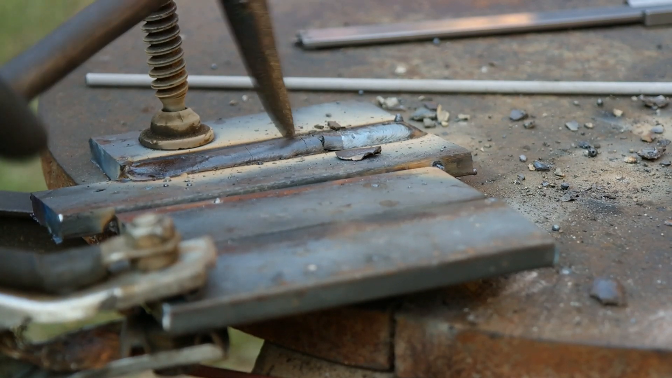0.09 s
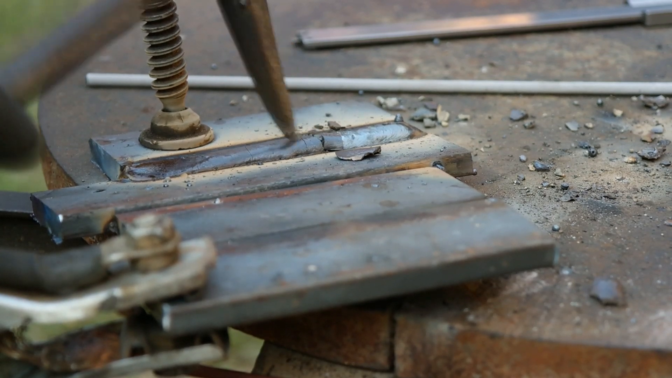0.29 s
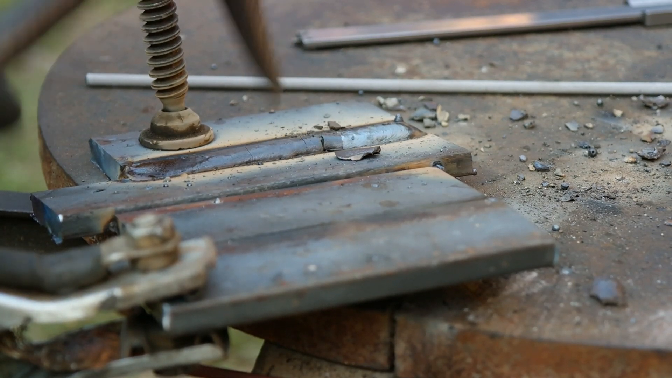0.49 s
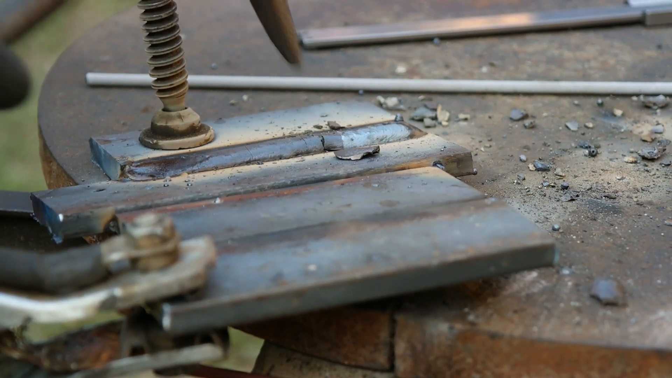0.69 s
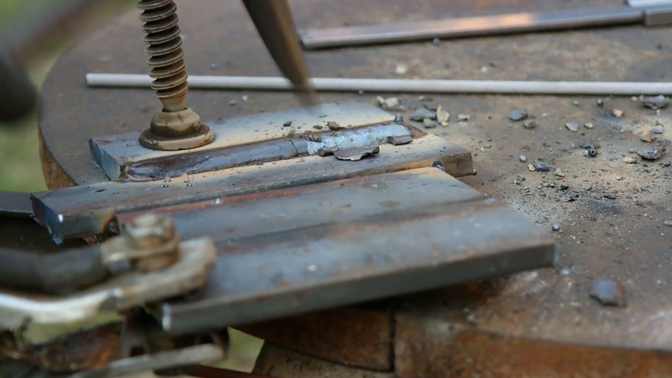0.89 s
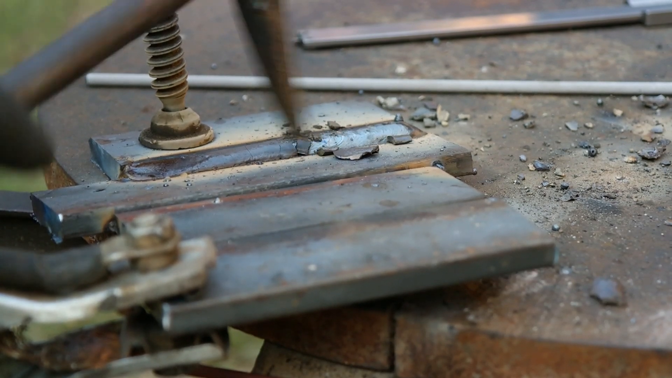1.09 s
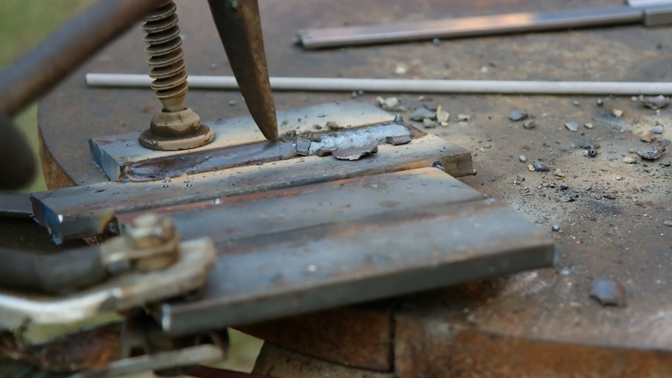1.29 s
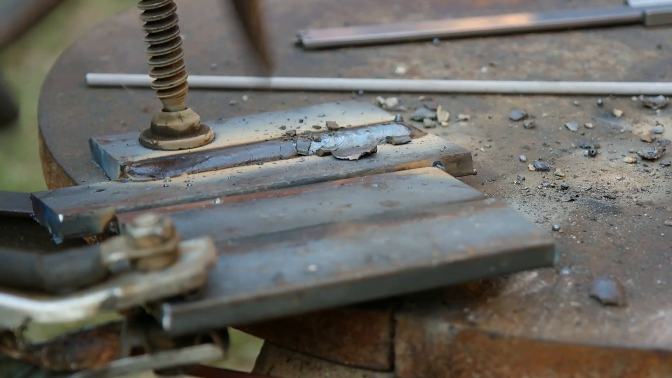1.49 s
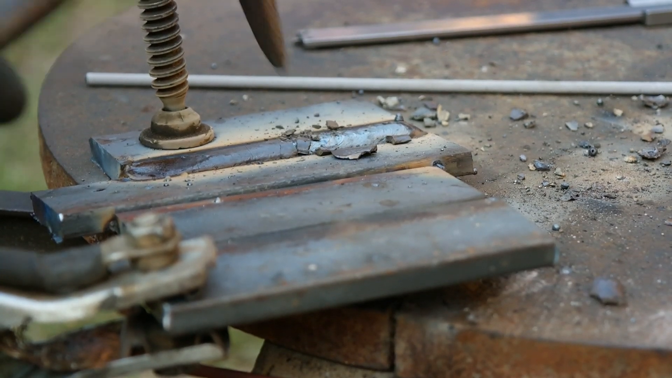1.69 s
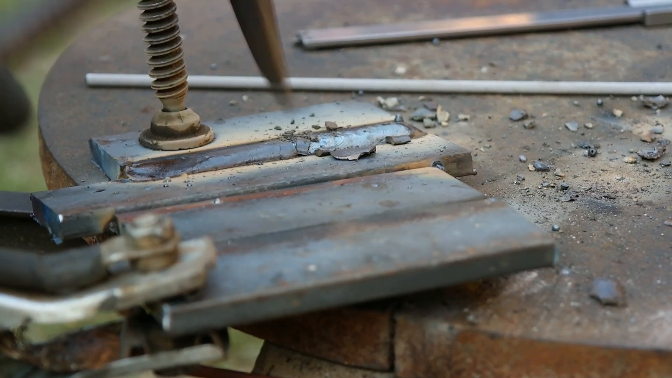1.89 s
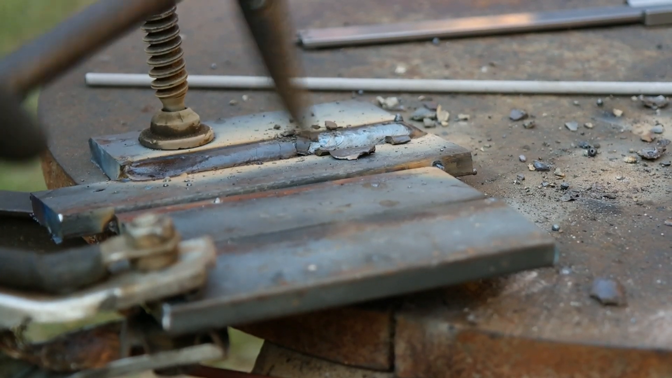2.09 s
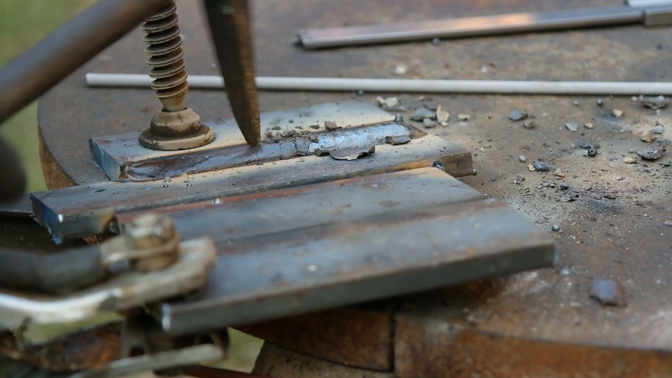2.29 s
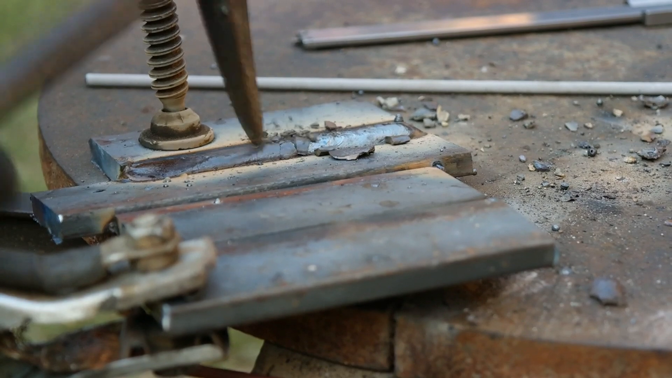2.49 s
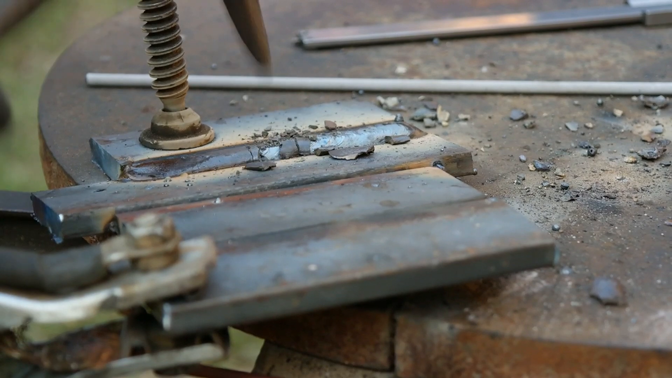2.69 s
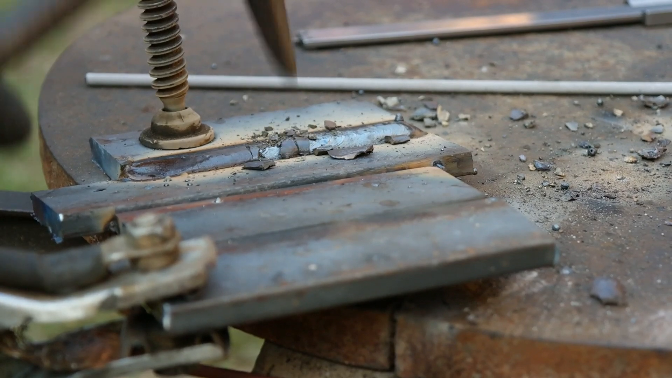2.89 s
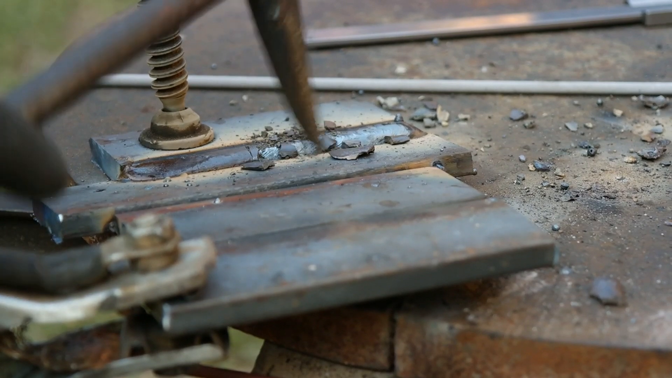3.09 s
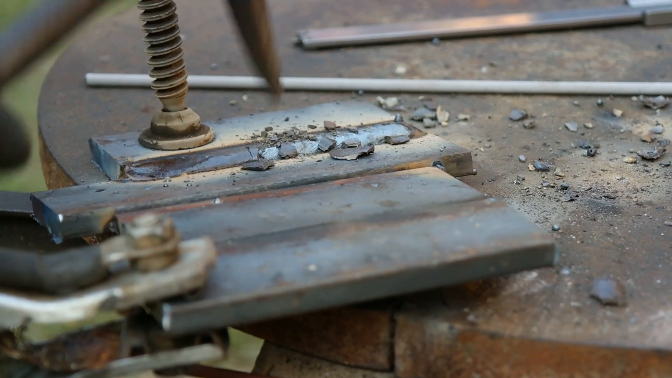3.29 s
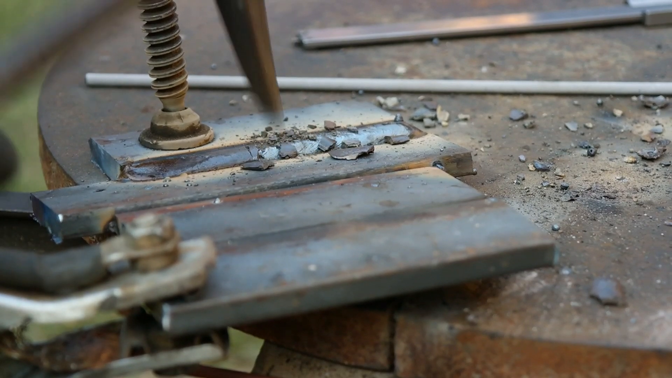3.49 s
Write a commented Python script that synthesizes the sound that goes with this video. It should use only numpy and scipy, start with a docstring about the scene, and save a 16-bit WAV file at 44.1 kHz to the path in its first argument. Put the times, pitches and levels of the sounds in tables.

```python
"""Chipping slag off a weld

A chipping hammer hits a weld about four times a second, close to a stereo microphone that overloads.
Each blow is a burst of crack noise plus dying sines for the hammer head, loose steel bars and steel table,
over a low thump from the overloaded input.
Jolted parts land again with small chinks, and a bar rubs briefly.
Behind them is a quiet outdoor hum of shaped noise and two wavering tones.
"""
import sys
import numpy as np
from scipy import signal
from scipy.fft import rfft, irfft
from scipy.io import wavfile
from scipy.ndimage import uniform_filter1d

SR = 44100
rng = np.random.default_rng(int(sys.argv[2]) if len(sys.argv) > 2 else 0)


def master_out(mix):
    """Clip the mix to full scale and print it as 16-bit PCM to the path in sys.argv[1]."""
    frames = np.transpose(np.atleast_2d(mix))
    ceiling = np.clip(frames, -1, 1)
    pcm = np.round(ceiling * 32767).astype(np.int16)
    wavfile.write(sys.argv[1], SR, pcm)


N = 154350  # length in samples, 3.5 s
LEAD_IN = SR // 10  # samples made before the start, so an earlier blow can ring into it

# All levels are before the input gain. Event levels set how hard each layer is driven.
# hammer blows: start_s, plate_db, hammer_db, knock_db, bars_db, low_ring_db, thud_db, crack_db,
# hammer_treble_db, loose_part_db, table_db, shimmer_db
BLOWS = [(-.055, -37.5, -6, -10, -12, -25, -30, -10, -25, -2, -31, -30.5),
         (.2005, -26.5, 0, -8.5, -20, -25.5, -43, -9, -7, -29, -29, -28),
         (.439, -33, -4, -8, -12, -25, -39.5, -7.5, -13, -38, -30.5, -27),
         (.6745, -32, -2, -9, -20, -31.5, -39.5, -10, -21, -38, -30, -26.5),
         (.9254, -33.5, -7.5, -7.5, -10.5, -18, -39, -8, -16, -20, -30.5, -29.5),
         (1.1738, -38.5, -15, -9, -6, -18.5, -34, -9, -14.5, -17, -32, -31),
         (1.4293, -26.5, -0.5, -9, -19, -27.5, -30.5, -6.5, -11.5, -28, -34, -26),
         (1.6787, -28, -2, -14.5, -19.5, -27, -36, -10, -9.5, -30, -29.5, -27.5),
         (1.9196, -30, -3, -11.5, -13.5, -25.5, -35, -7.5, -28, -25.5, -30, -27.5),
         (2.1596, -33.5, -6, -9.5, -11, -25, -27.5, -5, -16, -20, -30, -27.5),
         (2.398, -31.5, -2, -9, -11.5, -23.5, -50, -4.5, -20, -19, -29.5, -26.5),
         (2.6375, -27.5, -1, -12.5, -18.5, -26, -36.5, -8.5, -19, -37, -31, -27),
         (2.8879, -31.5, -3.5, -13.5, -15.5, -22, -35, -5.5, -15, -26, -29.5, -26),
         (3.1733, -43.5, -16, -22, -15, -28, -27, -11.5, -23, -8.5, -47, -28.5),
         (3.2002, -56, -10, -13, -13.5, -28, -37, -12, -21, -29, -34, -42)]
# light touches and falling slag: start_s, hammer_db, knock_db, crack_db
LIGHT_TOUCHES = [(1.1015, -33, -45, -41), (1.192, -20, -21, -17.5), (1.641, -77, -59.5, -43),
                 (2.803, -37, -37, -42.5), (2.598, -64, -58, -42), (2.914, -27.5, -27, -49)]
# a jolted loose part lands again: start_s, level_db
CHINKS = [(0.975, -29), (1.232, -34.5), (1.481, -43), (2.213, -24), (2.468, -23.5), (2.714, -35),
          (2.938, -37), (3.255, -61)]
# a bar rubs and hums briefly: start_s, level_db
RUBS = [(2.601, -30.5), (2.805, -37)]

# Each ringing object has a list of pitches and, in the same order, a list of modes (ways it rings).
# t60_s is the time to fall by 60 dB.
# hammer head: pitch_hz
HAMMER_HZ = [2950, 3640, 4420, 5050, 5286, 6050, 7370, 8800]
# hammer head: level_db, t60_s, left_minus_right_db, left_lead_rad
HAMMER_MODES = [(4, 0.024, -2.9, 0.022), (-16.5, 0.034, -14, 0.067), (-11.5, 0.027, 2, 0.9),
                (-17.5, 0.037, 16, -0.094), (-10.5, 0.021, -6.4, -0.91), (-10.5, 0.02, 1, 0.7),
                (-8.5, 0.033, 2.5, 0.57), (-26.5, 0.037, 10, -0.21)]
# treble of the hammer head: pitch_hz
HAMMER_TREBLE_HZ = [11375, 13500, 14640]
# treble of the hammer head: level_db, t60_s, left_minus_right_db, left_lead_rad
HAMMER_TREBLE_MODES = [(-1.5, 0.038, 3.3, 0.38), (-3, 0.023, 2, .5), (-17, 0.0297, 2.5, .8)]
# short knock: pitch_hz
KNOCK_HZ = [1410, 2040, 1700, 2300]
# short knock: level_db, t60_s, left_minus_right_db, left_lead_rad
KNOCK_MODES = [(1.5, .035, 0.15, 0), (2.5, 0.026, -1, 0.0044), (-6, 0.017, 0, 0), (-18, 0.0067, -1, 0)]
# loose steel bars: pitch_hz
BARS_HZ = [1157, 1300, 1505, 900, 1135]
# loose steel bars: level_db, t60_s, left_minus_right_db, left_lead_rad
BARS_MODES = [(-1, 0.1, 0, 0), (-17, 0.25, 0.022, 0.0065), (-8, 0.093, 0.0052, 0), (-15, 0.082, 0.02, 0),
              (-10.5, 0.17, 0, 0)]
# low ring: pitch_hz
LOW_RING_HZ = [527, 582, 400, 770, 558]
# low ring: level_db, t60_s, left_minus_right_db, left_lead_rad
LOW_RING_MODES = [(-5, 0.45, 0.015, 0.015), (-10, 0.47, 0.02, 0.018), (-10, 0.17, 0.0052, 0.0046),
                  (-9.5, 0.19, 0.012, 0.0067), (-15, 0.41, 0.0033, 0.0097)]
# thud: pitch_hz
THUD_HZ = [200, 260, 315]
# thud: level_db, t60_s, left_minus_right_db, left_lead_rad
THUD_MODES = [(1.3, 0.058, 0.005, 0.0027), (3.66, 0.065, 0, 0), (2, 0.058, 0.0057, 0)]
# loose part: pitch_hz
LOOSE_HZ = [12665, 7365]
# loose part: level_db, t60_s, left_minus_right_db, left_lead_rad
LOOSE_MODES = [(0, 0.079, 1.6, 0.6), (-6, 0.06, 3.2, 1)]
# plate: pitch_hz
PLATE_HZ = [4625, 4642, 5539, 6051, 6934, 8920, 9240, 9884, 10830, 10980]
# plate: level_db, t60_s, left_minus_right_db, left_lead_rad
PLATE_MODES = [(-1.5, 0.47, 1, 0.95), (-15, 0.31, 1, 0.7), (-23.5, 1.03, 1, 1), (-6.5, 0.41, 1, -0.17),
               (-4, 0.54, 2, -1.64), (-16, 0.28, 2, .4), (-12, .35, 1.9, .4), (-38, 0.56, 2, .5),
               (-29, .5, 2.7, .5), (-21.5, 0.88, 2, 1)]
# steel table: pitch_hz
TABLE_HZ = [733, 830, 960, 1120, 1160, 2220, 2255, 2982, 3644]
# steel table: level_db, t60_s, left_minus_right_db, left_lead_rad
TABLE_MODES = [(-17.5, 0.47, -0.15, 0), (-11, 0.72, 0, 0), (-15.5, 0.41, -0.44, 0.59), (-7.5, 1, 0, 0.0065),
               (-3, 0.42, -0.53, 0.14), (-2.5, 0.29, -0.54, 0.054), (-3.5, 0.24, -1.2, -0.15),
               (2.5, 0.17, -1, 0), (-8, 0.16, 0, 0)]
# rubbing bar: pitch_hz
RUB_HZ = [1350, 2050]
# rubbing bar: level_db, t60_s, left_minus_right_db, left_lead_rad
RUB_MODES = [(8.5, 0.074, 0, 0), (-4, 0.066, 0.0087, 0)]

# Noise colours hold only the balance between pitches; overall loudness is set elsewhere.
# breaking slag: pitch_hz, relative_db
CRACK_COLOUR = [(120, -33), (200, -17.5), (2130, 2), (3130, -5), (4040, -2.5), (7540, -10.5), (8420, -5.5),
                (11500, -12.5), (16000, -12)]
# table shimmer and grit: pitch_hz, relative_db
RATTLE_COLOUR = [(35, -66), (60, -59), (301, -13), (527, -12), (698, -13), (1140, 3.5), (2190, -2),
                 (2580, -8.5), (2900, 1), (4030, -6.5), (7060, -5.5), (14600, -16), (16000, -38)]
# die-away of shimmer and grit, before the spread between modes: pitch_hz, t60_s
RATTLE_T60 = [(100, .3), (260, 0.64), (700, 0.8), (1840, 0.48), (4850, 0.35), (12800, 0.3)]
# outdoor hum: pitch_hz, relative_db
HUM_COLOUR = [(15, -72), (25, -44.5), (108, -15.5), (166, -10), (190, -5), (293, -6), (326, -4.5),
              (439, -5.5), (591, 1.5), (714, -2.5), (863, -13), (14800, -26.5), (16000, -54)]
# wavering tones in the hum: pitch_hz, rms_level_db
HUM_TONES = [(110, -69.5), (733, -57.5)]
# how alike left and right are (1 = the same; the hum uses 0.15 less): pitch_hz, likeness
LIKENESS = [(60, 0.83), (180, 1), (550, 0.73), (1650, 0.64), (4970, 0.12), (15000, 0.1)]
# left level over right in noise, and on average in shimmer: pitch_hz, left_minus_right_db
LEAN = [(60, 0.85), (180, 2.9), (550, 5.4), (1650, -0.85), (4970, -1.2), (15000, 3.2)]
# left phase ahead of right in noise, and on average in shimmer: pitch_hz, left_lead_rad
LEAD = [(100, 1.33), (3000, -0.9), (5000, 0.11), (8000, 1.9), (11000, -0.066), (15000, 2.8)]

SPOT_DB = 1.8  # how much the point of impact changes each mode
BAR_RISE_S, TABLE_RISE_S, LAND_RISE_S, RUB_RISE_S = 0.0025, 0.012, 0.003, 0.0076
THUMP_S = 0.00084  # time scale of the low overload thump
CRACK_T60_S, CRACK_GAIN_DB, SNAP_T60_S, SNAP_DB = 0.046, -3, 0.0077, 3.5
SHIMMER_MODES = 360  # the dense small modes of the table top
SHIMMER_DB, SHIMMER_SPREAD_DB = -2.02, 6
SHIMMER_T60_SPREAD, SHIMMER_TURN_RAD = 0.45, 1  # the first is a spread in natural log
WASH_DB, LUMPY_DB, FLICKER_DB = -0.5, 3.0, 1.0  # grit: level, patchiness and level flicker
HUM_DB = -51.5
DRIVE_DB, CEILING, KNEE = 2.5, 0.95, 7.0  # input gain, largest level, sharpness of the bend
EDGE_HZ = 15900  # top of the recorded band


def amp(db):
    """Turn decibels into a plain multiplier."""
    return 10 ** (np.asarray(db) / 20)


def evened(x):
    """Scale a signal to an rms level of 1."""
    return x / np.sqrt(np.mean(x ** 2) + 1e-20)


def read(points, hz):
    """Read a table between its points, along a logarithmic pitch scale."""
    f, value = np.transpose(points)
    return np.interp(np.log(hz + 1), np.log(f + 1), value)


def column(table, k):
    """Pair each start time with the level in column k."""
    return [(row[0], row[k]) for row in table]


def add(mix, start_s, sound):
    """Lay a sound into the mix at its start time."""
    part = mix[:, round(start_s * SR) + LEAD_IN:][:, :sound.shape[1]]
    part += sound[:, :part.shape[1]]


def ring(hz, modes, events, rise_s=0.00042, spread_rad=.6, damped=False):
    """Dying sines of one object for each event; a damped object is stopped by its next contact."""
    hz = np.reshape(hz, (-1, 1))
    db, t60, lean, lead = np.transpose(modes)[..., None]
    t = np.arange(SR // 2) / SR
    out = np.zeros((2, N + LEAD_IN))
    rise = 1 - np.exp(-t / rise_s)
    tail_fade = np.minimum(10 - 20 * t, 1)  # closes the last 50 ms
    dying = np.exp((2j * np.pi * hz - np.log(1000) / t60) * t) * amp(db) * rise * tail_fade
    side_level = amp([lean / 2, -lean / 2])[..., 0]
    side_phase = np.exp([.5j * lead, -.5j * lead])[..., 0]
    ends = [s for s, _ in events[1:]] + [np.inf]
    spots = rng.standard_normal((len(events), 2, len(hz)))
    for (s, level), end, (spot, turn) in zip(events, ends, spots):
        # the point of impact reweights and turns every mode
        weights = side_level * side_phase * amp(level + SPOT_DB * spot) * np.exp(1j * spread_rad * turn)
        stop = np.clip((end - s - t) / .003 + 1, 0, 1) if damped else 1
        add(out, s, (weights @ dying).imag * stop)
    return out


def noise(colour, lumpy_db, flicker_db, t60=None, starts=()):
    """Stereo noise from random short spectra, steady or dying after each start."""
    frames = (N + LEAD_IN) // 64 + 8
    hz = np.fft.rfftfreq(256, 1 / SR)
    a, b, c, d, patch = rng.standard_normal((frames, 129, 5)).T
    patch = uniform_filter1d(patch, size=4, axis=0)  # smooth across pitch
    patch = evened(uniform_filter1d(patch, size=8, axis=1))  # smooth across time
    flicker = evened(uniform_filter1d(rng.standard_normal(frames), size=4))
    same = np.clip(read(LIKENESS, hz), -1, 1)[:, None]
    left = a + 1j * b
    right = same * left + np.sqrt(1 - same ** 2) * (c + 1j * d)
    right = right * (np.exp(-1j * read(LEAD, hz)) / amp(read(LEAN, hz)))[:, None]
    z = np.array([left, right]) * amp(read(colour, hz))[:, None]
    # loudness is set before the patches, flicker and die-away
    scale = np.sqrt(np.mean(signal.istft(z, nperseg=256, noverlap=192)[1] ** 2))
    z *= amp(lumpy_db * patch + flicker_db * flicker)
    if t60:
        t = (np.arange(frames) * 64 - LEAD_IN) / SR
        fall_s = read(t60, hz)[:, None]
        power = sum((t > s) * amp(db - 60 * abs(t - s) / fall_s) ** 2 for s, db in starts)
        z *= np.sqrt(power)
    return signal.istft(z, nperseg=256, noverlap=192)[1][:, :N + LEAD_IN] / scale


def hammer():
    """The struck hammer head rings in short-lived modes, with a separate treble."""
    body = ring(HAMMER_HZ, HAMMER_MODES, column(BLOWS, 2) + column(LIGHT_TOUCHES, 1))
    return body + ring(HAMMER_TREBLE_HZ, HAMMER_TREBLE_MODES, column(BLOWS, 8))


def knock():
    """A short knock: a few modes that die within hundredths of a second."""
    return ring(KNOCK_HZ, KNOCK_MODES, column(BLOWS, 3) + column(LIGHT_TOUCHES, 2), 0.00039)


def cracks():
    """Slag breaks with a quick snap and a slightly longer burst of bright noise."""
    t = np.arange(SR // 10) / SR
    shape = np.zeros((1, N + LEAD_IN))
    burst = amp(CRACK_GAIN_DB - 60 * t / CRACK_T60_S)
    snap = amp(SNAP_DB - 60 * t / SNAP_T60_S)
    onset = np.minimum(t / 0.00023, 1)
    for s, db in column(BLOWS, 7) + column(LIGHT_TOUCHES, 3):
        add(shape, s, amp(db) * (burst + snap)[None] * onset)
    return shape * noise(CRACK_COLOUR, 3.4, 0.62)


def bars():
    """The loose steel bars ring in modes that rise a little after the blow."""
    return ring(BARS_HZ, BARS_MODES, column(BLOWS, 4), BAR_RISE_S)


def low_ring():
    """A lower, longer ring from modes that rise as the bars do."""
    return ring(LOW_RING_HZ, LOW_RING_MODES, column(BLOWS, 5), BAR_RISE_S)


def thuds():
    """A low thump from the overloaded input at each blow, uneven left to right, plus low dying modes."""
    events = column(BLOWS, 6)
    u = np.arange(SR // 20) / SR / THUMP_S
    thump = u * (2 - u) * np.exp(-u)  # one swing up, then down and back to rest
    out = ring(THUD_HZ, THUD_MODES, events, BAR_RISE_S)
    for s, db in events:
        side_change = amp(2.5 * rng.standard_normal((2, 1)))
        add(out, s, amp(db + 6) * thump * side_change)
    return out


def loose_part():
    """A jolted part chinks at each blow and landing; the next contact stops its ring."""
    contacts = sorted(column(BLOWS, 9) + CHINKS)
    return ring(LOOSE_HZ, LOOSE_MODES, contacts, LAND_RISE_S, damped=True)


def plate():
    """Bright plate modes that build up slowly, with widely varied phases."""
    return ring(PLATE_HZ, PLATE_MODES, column(BLOWS, 1), TABLE_RISE_S, 2.46)


def table():
    """The steel table rings in modes that build up slowly after each blow."""
    return ring(TABLE_HZ, TABLE_MODES, column(BLOWS, 10), TABLE_RISE_S, 2.6)


def shimmer():
    """Hundreds of weak modes of the table top, with a wash of rattling grit."""
    events = column(BLOWS, 11)
    u, a, b, c, d = rng.standard_normal((SHIMMER_MODES, 5)).T
    hz = np.linspace(12, 123, SHIMMER_MODES) ** 2 * (1 + .004 * u)
    # higher modes lie further apart, so each carries a wider slice of the colour
    db = read(RATTLE_COLOUR, hz) + 5 * np.log10(hz)
    db += SHIMMER_SPREAD_DB * np.clip(a, -3, 1.6)
    db += SHIMMER_DB - 10 * np.log10(np.sum(amp(db) ** 2) / 2)
    t60 = read(RATTLE_T60, hz) * np.exp(SHIMMER_T60_SPREAD * np.clip(b, -2, 1))
    lean = read(LEAN, hz) + 2 * c
    lead = read(LEAD, hz) + SHIMMER_TURN_RAD * d
    tones = ring(hz, np.transpose([db, t60, lean, lead]), events, 0.0016, 2.93)
    return tones + amp(WASH_DB) * noise(RATTLE_COLOUR, LUMPY_DB, FLICKER_DB, RATTLE_T60, events)


def rubbing_bar():
    """A bar rubs and hums briefly: two dying modes with a soft start."""
    return ring(RUB_HZ, RUB_MODES, RUBS, RUB_RISE_S)


def hum():
    """Distant outdoor wash of shaped noise, with two tones that waver at random."""
    n = N + LEAD_IN
    hz = np.fft.rfftfreq(n, 1 / SR)
    a, b = rfft(rng.standard_normal((2, n)))
    same = np.clip(read(LIKENESS, hz) - .15, 0, 1)
    sides = np.array([a, same * a + np.sqrt(1 - same ** 2) * b])
    out = amp(HUM_DB) * evened(irfft(sides * amp(read(HUM_COLOUR, hz)), n))
    for f, db in HUM_TONES:
        waver = uniform_filter1d(rng.standard_normal((2, n)), size=4000)
        tone = (waver[0] + 1j * waver[1]) * np.exp(2j * np.pi * f * np.arange(n) / SR)
        out += amp(db) * evened(tone.real)
    return out


def scene():
    """Add all layers, then drop the lead-in."""
    mix = hammer() + knock() + cracks()
    mix += bars() + low_ring() + thuds()
    mix += loose_part() + plate() + table() + shimmer()
    mix += rubbing_bar() + hum()
    return mix[:, LEAD_IN:]


def record(dry):
    """The input bends loud peaks smoothly under a ceiling; then a filter removes the top treble."""
    x = dry * amp(DRIVE_DB) / CEILING
    x = CEILING * x / (1 + abs(x) ** KNEE) ** (1 / KNEE)
    low_pass = signal.firwin(301, EDGE_HZ, window=("kaiser", 9), fs=SR)
    return signal.oaconvolve(x, low_pass[None], "same")


dry = scene()
out = record(dry)
master_out(out)
```